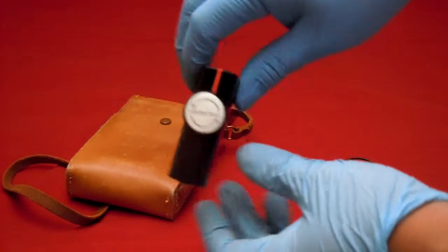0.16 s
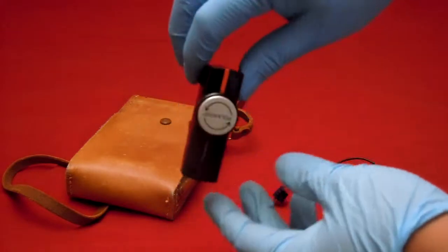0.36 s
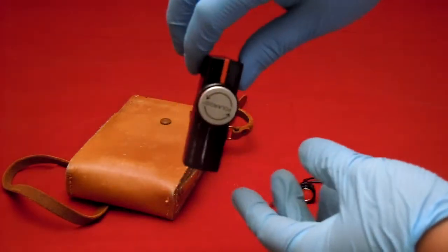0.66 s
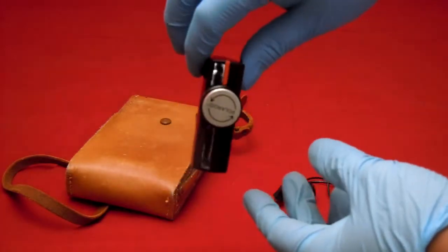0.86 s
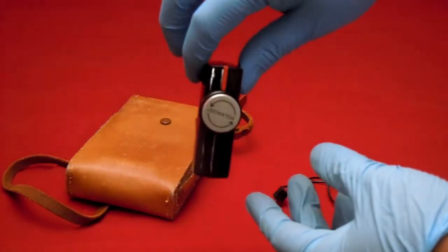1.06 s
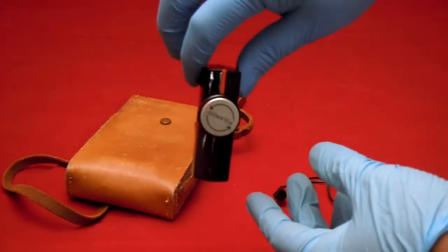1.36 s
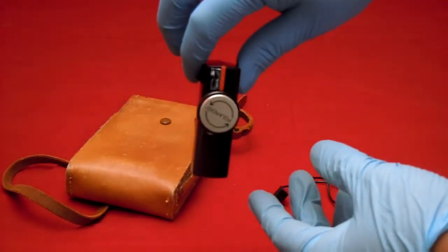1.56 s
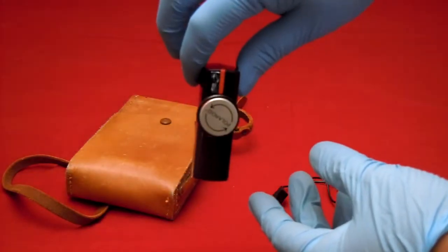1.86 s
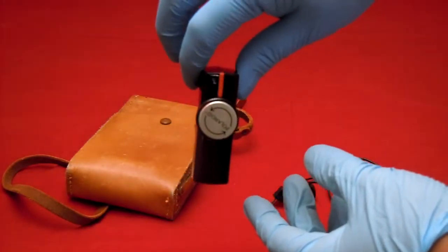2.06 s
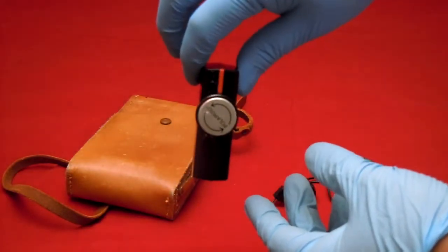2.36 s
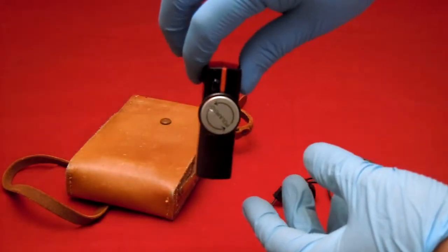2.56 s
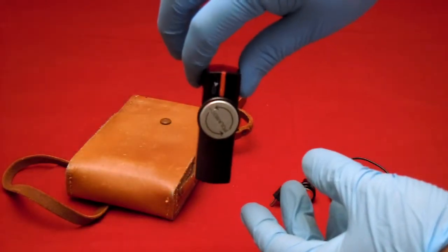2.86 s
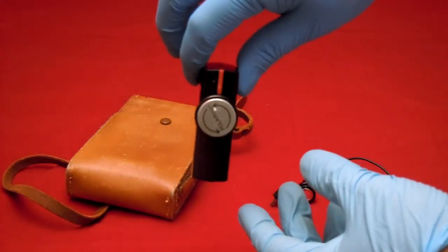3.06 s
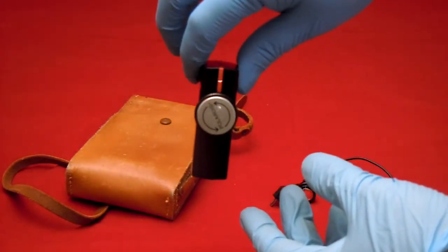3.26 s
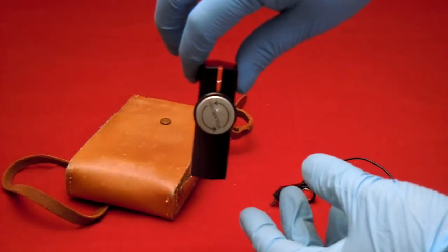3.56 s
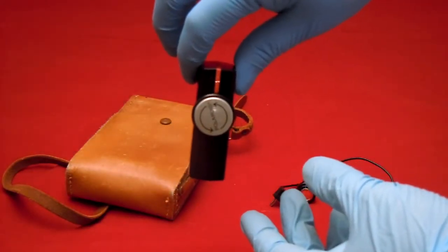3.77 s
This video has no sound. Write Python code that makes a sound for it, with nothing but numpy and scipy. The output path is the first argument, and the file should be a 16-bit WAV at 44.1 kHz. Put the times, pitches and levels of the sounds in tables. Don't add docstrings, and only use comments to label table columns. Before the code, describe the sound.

A small clockwork timer whirs from 0 to about 3.9 seconds, already running at the start and never stopping. Roughly 220 metallic ticks a second blur into a bright, gritty buzz, swelling unevenly about five times a second and easing to about 185. Close stereo microphones, quiet room, short echoes; faint air, hum and thin high whine. Very soft low table bumps near 2.9 and, fainter, 3.4.

```python
import sys
import numpy as np
from scipy import signal
from scipy.fft import rfft, irfft
from scipy.io import wavfile
from scipy.ndimage import uniform_filter1d

SR = 44100
rng = np.random.default_rng(int(sys.argv[2]) if len(sys.argv) > 2 else 0)


def inscribe(sig):
    pcm = np.round(np.clip(np.atleast_2d(sig).T, -1, 1) * 32767)
    wavfile.write(sys.argv[1], SR, pcm.astype(np.int16))


def ratio(d):
    e = np.asarray(d, float) / 20
    return 10 ** e


N = 171990


def level(x, db):
    return x * ratio(db) / np.sqrt(np.mean(x ** 2))


def curve(points, column=1):
    rows = np.array(points).T
    return np.interp(np.arange(N) / SR, rows[0], rows[column])


def colour(x, points):
    hz, db = np.array(points).T
    f = np.maximum(np.arange(N // 2 + 1) * SR / N, 1)
    gain = ratio(np.interp(np.log(f), np.log(hz), db))
    return irfft(rfft(x) * gain, N)


def ring(x, hz, width):
    r = np.exp(-np.pi * width / SR)
    w = 2 * np.pi * hz / SR
    return signal.lfilter([(1 - r * r) / 2, 0, -(1 - r * r) / 2], [1, -2 * r * np.cos(w), r * r], x)


def walk(rate):
    k = int(SR / rate)
    steps = np.repeat(rng.standard_normal(N // k + 1), k)
    return 0.52 * uniform_filter1d(uniform_filter1d(steps, k), k)[:N]


def clicks(at, size):
    return np.bincount(np.clip(at, 0, N - 1), size, N)


def fade(x, seconds):
    return signal.lfilter([1], [1, -np.exp(-1 / (seconds * SR))], x)


# t/s, ticks per second
TICK_PACE = [(0, 219.7), (1.0, 207.5), (1.15, 212), (1.35, 200.5), (2.0, 192.5), (2.3, 199.5), (2.65, 196),
             (3.0, 184.5), (3.25, 183.5), (3.45, 188), (3.9, 185.5)]
# t/s, level/dB, open face turned towards the microphones/dB, looseness of grip/dB
FORCE_AND_GRIP = [(0, -22, -11, -16), (.3, -21.5, -13.5, -15), (.62, -21.5, -14, -16.5),
                  (.85, -23, -13, -16), (1.12, -21.5, -14, -16.5), (1.35, -21.5, -15, -18.5),
                  (1.6, -22, -15.5, -17), (1.9, -22.5, -16, -18.5), (2.2, -22.5, -15, -15),
                  (2.45, -22.5, -15, -18), (2.9, -23, -15.5, -18), (3.2, -23.5, -13.5, -17),
                  (3.6, -23.5, -13.5, -17), (3.9, -23, -14, -18.5)]
LEAF_STRENGTH = [-2, .7, -2, .9, -.7, 1.6]
PLATE_PITCHES = [5935, 6340, 6585, 6740, 6900, 7480, 7830, 8045, 8195, 8485, 8748, 8878, 9310, 10222]
# width/Hz, level/dB
PLATE_RINGS = [(50, -2), (80, -5), (45, 1.5), (60.4, 3), (88, -10.5), (170, -6), (60, -1), (45, -7),
               (60, -14), (55, -1.5), (60, -0.5), (80, -0.5), (50, -5.5), (50, -8)]
CASE_PITCHES = [1790, 1930, 1650, 3200, 3660, 4380, 4865, 5050, 5200, 5340, 9700, 11800, 12270, 12420]
# width/Hz, level/dB
CASE_RINGS = [(68, -7), (60, -10), (54, -22), (180, -14.5), (94, -11), (82, -11), (91.5, -5.5), (120, -5),
              (98, -7), (66, -4.5), (230, -27), (80, -30), (60, -9), (60, -10)]
# f/Hz, width/Hz, level/dB
BROAD_CLACK = [(2070, 2150, -23.5), (3990, 1360, -14), (6280, 530, -5.5), (7940, 1360, -1.5),
               (9380, 2030, -8), (11160, 2800, -14), (13400, 1800, -18)]
# f/Hz, level/dB
SIDE_COLOUR = [(1000, -72), (4000, -29), (5000, -11), (6500, -15), (8200, -7.5), (10000, -6.5), (13000, -4)]


def timer():
    wheel_ticks, leaves, wheel_start = 42, 6, -.17
    catch_up_turns, wobble_share, wobble_db = .22, .085, 1.3
    jitter_s, scatter_db, mode_scatter_db, drift_db = .00016, .9, 2.6, .5
    bounce_s, bounce_db = .0011, -5
    strike_s, scrape_s, scrape_db = .00028, .0023, 1

    pace = curve(TICK_PACE)
    turn = (np.cumsum(pace) / SR / wheel_ticks + wheel_start) % 1
    cam = uniform_filter1d(.4 * turn - np.exp(-turn / catch_up_turns), size=500)
    cam = cam - cam.mean()
    phase = np.cumsum(pace * (1 + wobble_share * cam)) / SR

    tick = np.arange(int(np.ceil(phase[-1])))
    late, uneven, bounce_late, bounce_uneven, _ = rng.standard_normal((N // 150, 5))[:len(tick)].T
    at = np.interp(tick + .1, phase, np.arange(N)) + jitter_s * SR * late
    at = at.astype(int).clip(0, N - 1)
    swell = wobble_db * cam + drift_db * walk(25.17)
    db = np.array(LEAF_STRENGTH)[tick % leaves] + scatter_db * uneven + swell[at]
    bounce_at = at + (bounce_s * SR * (1 + .3 * bounce_late)).astype(int)

    scrape_shape = fade(clicks(at, ratio(db)), scrape_s)
    rattle = np.sign(rng.standard_normal(N))
    facing, loose = curve(FORCE_AND_GRIP, column=2), curve(FORCE_AND_GRIP, column=3)
    facing, loose = facing - np.mean(facing), loose - np.mean(loose)

    pitches = PLATE_PITCHES + CASE_PITCHES
    modes = [(hz, *shape) for hz, shape in zip(pitches, PLATE_RINGS + CASE_RINGS)]
    mid = side = 0
    for hz, width, gain_db in modes + BROAD_CLACK:
        own = mode_scatter_db * rng.standard_normal((N // 150, 2))[:len(tick)].T
        hit = clicks(at, ratio(db + own[0]))
        bounce = clicks(bounce_at, ratio(db + bounce_db + own[1] + 1.1 * bounce_uneven))
        strike = level(fade(hit + bounce, strike_s) * rattle, 0)
        scrape = level(scrape_shape * rng.standard_normal(N), scrape_db)
        sound = ring(ring(strike + scrape, hz, width), hz, max(width, 1500.))
        face_db = facing * np.clip((hz - 7500) / 3500, 0, 1)
        grip_db = 1.6 * loose * (hz < 2500)
        sound = sound * ratio(gain_db + face_db + grip_db)
        mid = mid + sound
        side = side + sound * rng.choice([-1, 1])

    force = ratio(curve(FORCE_AND_GRIP))
    scale = 1 / np.sqrt(np.mean(mid ** 2))
    shifted = signal.hilbert(side).imag
    return force * mid * scale, colour(force * shifted * scale, SIDE_COLOUR)


def room(x):
    sway_s, t60_s, room_db = .299, .35, -8.5
    t = np.arange(int(.4 * SR)) / SR
    now = np.arange(N) / SR / sway_s
    out = 0
    for step in range(int(now[-1]) + 2):
        tail = rng.standard_normal(len(t)) * ratio(-60 * t / t60_s) * (t > .003)
        echo = level(tail, room_db) / np.sqrt(len(t))
        share = np.cos(np.pi / 2 * np.clip(now - step, -1, 1))
        out = out + signal.oaconvolve(x * share, echo)[:N]
    return out


# f/Hz, level/dB per Hz
AIR_COLOUR = [(12, -42), (20, -4.5), (170, -14), (237, -7), (293, -9.5), (649, -11.5), (1380, -13.5),
              (1850, -14.5), (3000, -18.5), (3900, -25), (6600, -120)]
# f/Hz, level/dB
AIR_SIDE = [(25, -5.5), (70, -8), (150, -13), (1000, -19), (3000, -30)]
# f/Hz, width/Hz, level/dB
BOXY_PEAKS = [(152.8, 2.7, -53), (210, 8.3, -49), (362, 19.5, -48), (444, 38, -48.5), (563, 2.7, -50.5),
              (587, 14, -54), (663.3, 21, -46), (882, 75, -48)]


def air():
    air_db = -36
    mid = level(colour(rng.standard_normal(N), AIR_COLOUR), air_db)
    other = level(colour(rng.standard_normal(N), AIR_COLOUR), air_db)
    side = colour(other, AIR_SIDE)
    boxy = sum(level(ring(rng.standard_normal(N), hz, width), db) for hz, width, db in BOXY_PEAKS)
    return mid + boxy, side


def tones():
    hum_hz, hum_db = 240., -38.5
    whine_hz, whine_db, whine_left_db = 12857.1, -40.5, -1.5
    t = np.arange(N) / SR
    hum = np.sin(2 * np.pi * hum_hz * t) * ratio(hum_db + 3 + .9 * walk(9.04))
    lead = np.array([[0], [1.5]])
    whine = np.sin(2 * np.pi * whine_hz * t + lead) * ratio(whine_db + np.array([[whine_left_db], [0]]))
    return hum + whine


# t/s, peak level/dB
TABLE_NUDGES = [
    (2.879, -34.5),
    (3.409, -40),
]


def thumps():
    thump_hz, width_hz = 55, 27
    at, db = np.array(TABLE_NUDGES).T
    nudge = clicks((at * SR).astype(int), ratio(db))
    bump = ring(ring(nudge, thump_hz, width_hz), thump_hz, 60.)
    return bump / np.abs(bump).max() * ratio(db.max())


# f/Hz, level/dB
LEFT_LEAN = [(3500, -40), (5000, 0), (7800, 0), (9500, -12), (11000, -40)]


def scene():
    left_db = 2.1
    mid, side = timer()
    lean = colour(mid, LEFT_LEAN) * (ratio(left_db / 2) - 1)
    echoes = room(mid)
    echoes_side = colour(np.roll(echoes, SR // 10), SIDE_COLOUR)
    hush, hush_side = air()
    mid = mid + echoes + hush + thumps()
    side = side + lean + echoes_side + hush_side
    return np.array([mid + side, mid - side]) + tones()


def roll_off(x):
    return signal.sosfilt(signal.butter(12, 14100, fs=SR, output="sos"), x)


def record(dry):
    return roll_off(dry)


dry = scene()
out = record(dry)
inscribe(out)
```